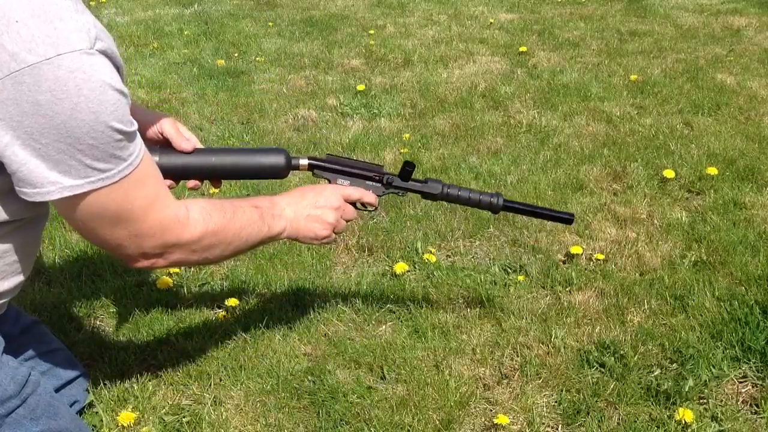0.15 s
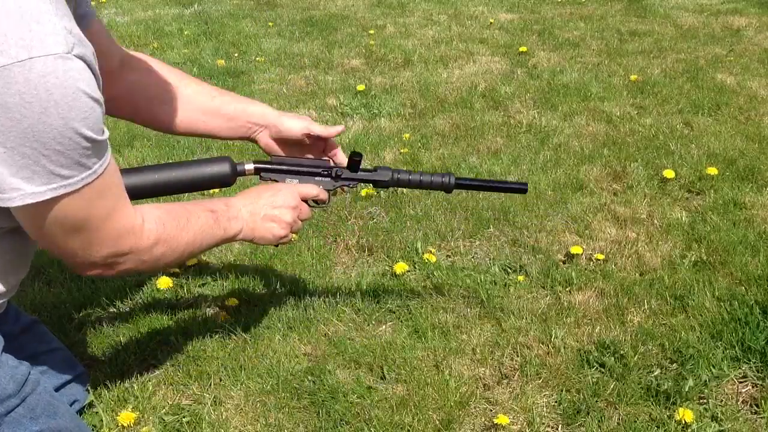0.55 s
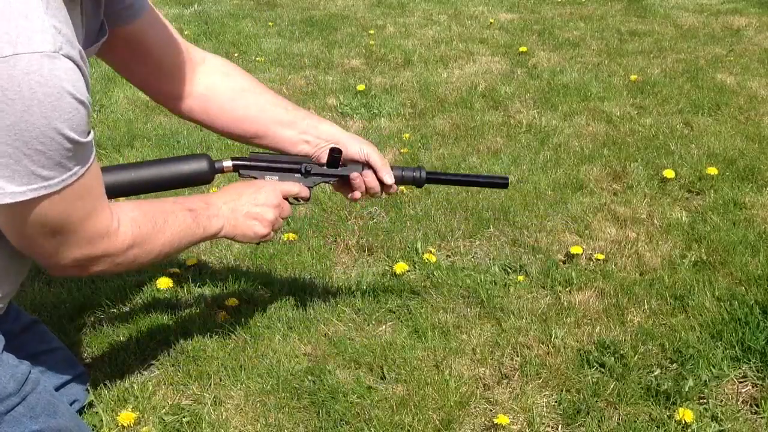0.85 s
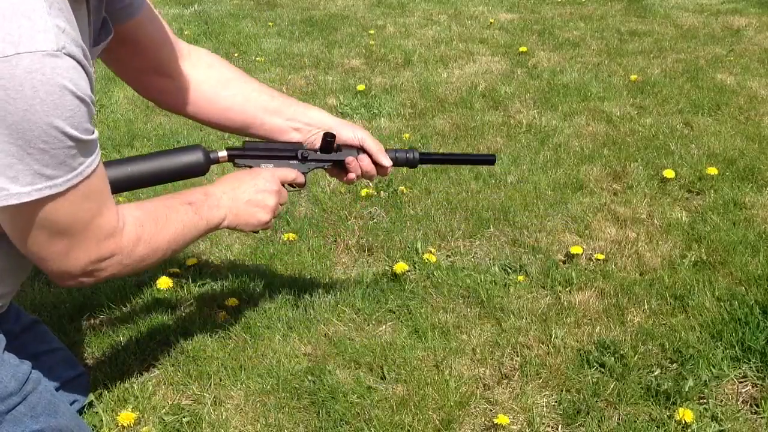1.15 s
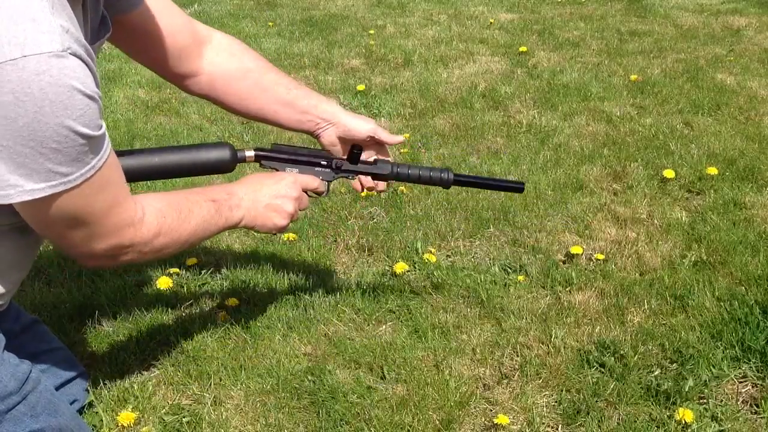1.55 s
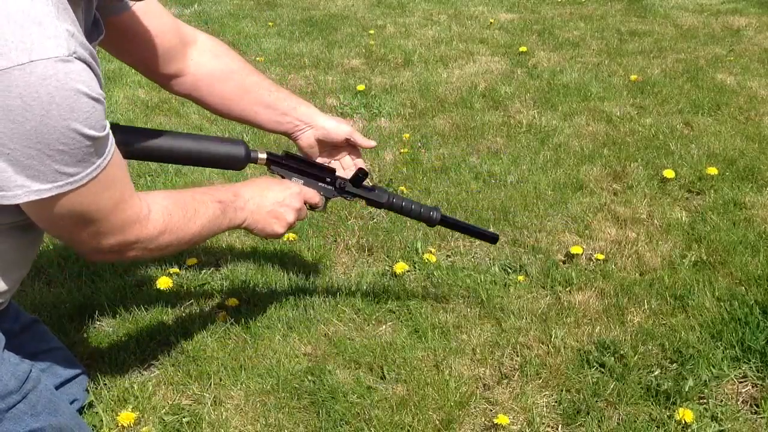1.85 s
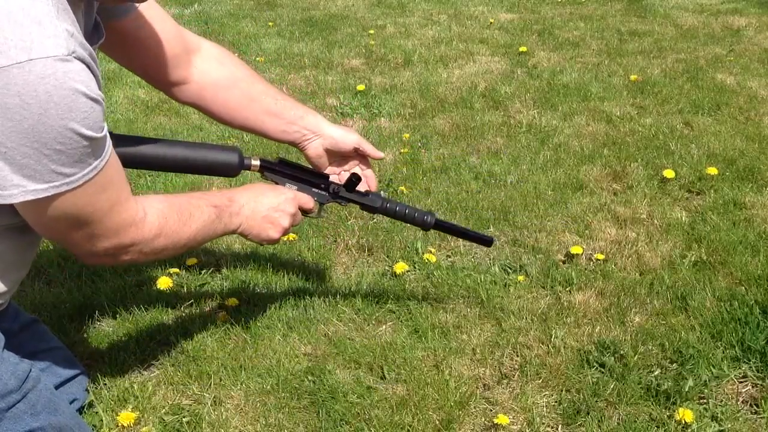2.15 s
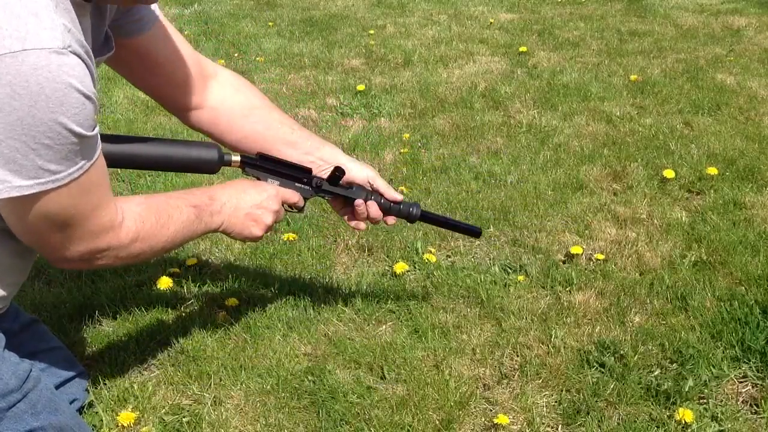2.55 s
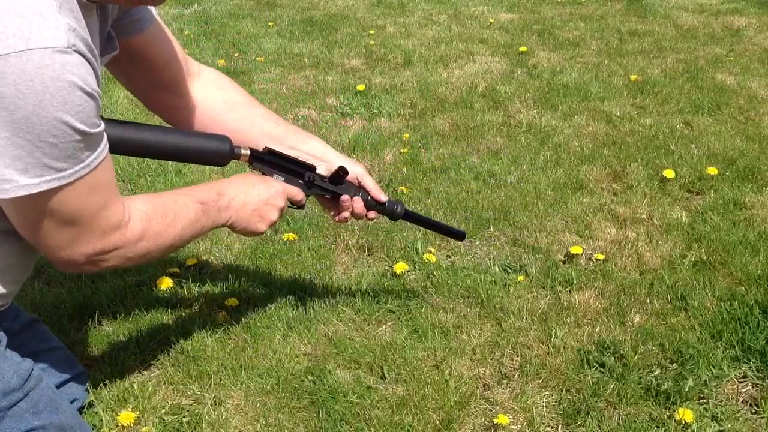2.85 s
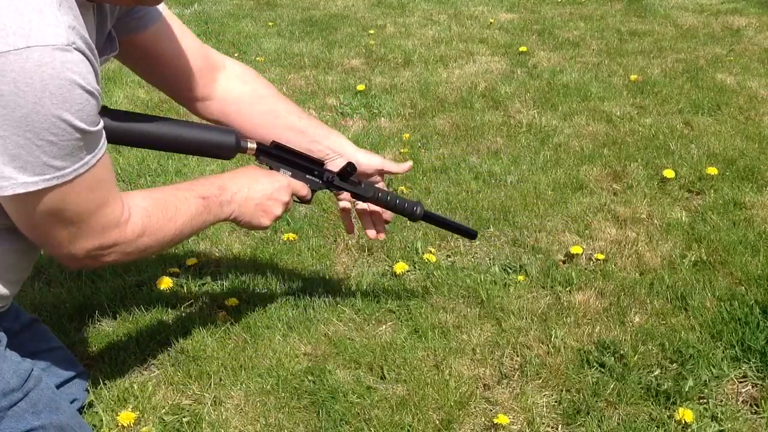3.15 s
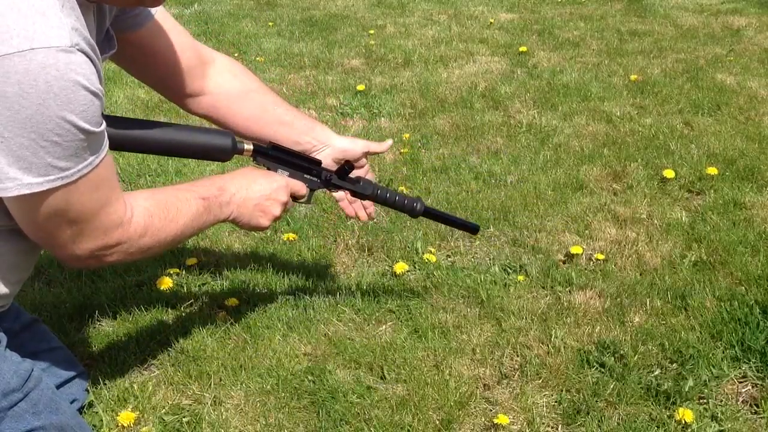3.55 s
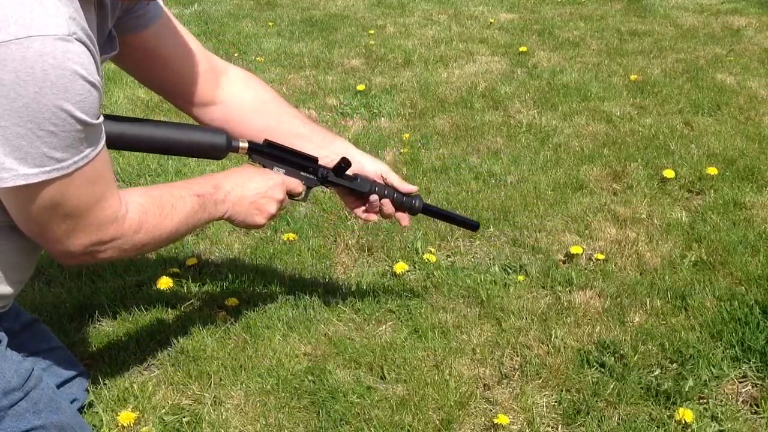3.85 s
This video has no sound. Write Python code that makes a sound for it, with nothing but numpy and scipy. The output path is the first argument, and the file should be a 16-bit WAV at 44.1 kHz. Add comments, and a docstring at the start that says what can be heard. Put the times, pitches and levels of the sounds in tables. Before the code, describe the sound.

A paintball marker is cycled and fired twice on a lawn, close to a small microphone. After quiet air, faint birds and distant traffic, the pump clacks back with a hollow pop at 0.9 seconds and forward at 1.25. A loud, slightly clipped gas crack follows at 2.1, echoing from walls and trees. Drier clacks come at 2.7 and 3.0, then a second shot at 3.4 fades in a diffuse tail.

```python
"""A lawn, near walls around it and trees beyond, with one small microphone close to a gas paintball marker.
Its pump is cycled twice, clacking at rear and front stops; the first pull adds a hollow pop of air modes.
Each of two shots is hammer ticks, a pressure crack, a gas rush of decaying noise and a barrel ring,
thrown back by walls as delayed copies and by yard and trees as diffuse noise tails.
Underneath lie faint gliding bird notes and filtered noise for open air, a drone and far traffic."""
import sys
import numpy as np
from scipy import signal
from scipy.fft import rfft, irfft, next_fast_len
from scipy.io import wavfile
from scipy.ndimage import map_coordinates

SR = 44100
rng = np.random.default_rng(int(sys.argv[2]) if len(sys.argv) > 2 else 0)


def store_wav(level_fs):
    """Save 16-bit WAV to argv[1]."""
    pcm = np.round(np.clip(np.atleast_2d(level_fs), -1, 1) * 32767)
    wavfile.write(sys.argv[1], SR, pcm.T.astype(np.int16))


N = 176400

# Open air, relative spectrum: pitch_hz, level_db (per Hz)
AIR_COLOUR = [(15, -81), (25, -51), (43, -74), (71, -20.5), (118, -12.5), (237, 1.5), (335, -8), (475, -5),
              (621, -8), (952, -6.5), (2130, -19), (3090, -20.5), (3440, -23.5), (4620, -24), (5280, -24),
              (6200, -24.5), (15000, -30.5)]
AIR_DB, AIR_WAVER_DB, AIR_WAVER_RATE = -54.5, 0.96, 6.18  # rate in knots per second
# Far traffic, relative spectrum: pitch_hz, level_db (per Hz)
TRAFFIC_COLOUR = [(200, -16), (550, -5), (950, 3.5), (1400, -4), (2500, -30), (6000, -49)]
# Far traffic over time: time_s, level_db
TRAFFIC_FADE = [(0, -54.5), (.5, -60.5), (1, -57), (2, -69.5), (3, -67), (4, -65)]
DRONE_HZ, DRONE_WIDTH_HZ, DRONE_DB = 229.4, 50, -63

# Bird notes: start_s, length_s, start_pitch_hz, end_pitch_hz, level_db, buzz (0-1)
BIRD_NOTES = [(0, 0.33, 5070, 6050, -70, 0.3), (.365, 0.042, 7880, 8300, -62, .3),
              (0.358, 0.046, 3060, 2950, -63.5, 0.48), (.72, 0.23, 5110, 5300, -69.5, 0.25),
              (1.063, 0.099, 3490, 2760, -54.5, 0.85), (1.48, .2, 5150, 5600, -77, .08),
              (1.787, 0.041, 5900, 7400, -65, 0.4), (1.827, 0.054, 4030, 3670, -63, 0.7),
              (1.849, 0.061, 3150, 2670, -53.5, .6), (2.514, 0.064, 2430, 2600, -51.5, 0.83),
              (3.253, 0.048, 2330, 2600, -54, 0.52)]
BUZZ_HZ, BUZZ_RATE = 400, 800  # pitch wobble at buzz 1; knots per second

# Small ticks of pump and trigger: start_s, level_db
HANDLING_TICKS = [(.884, -49), (1.178, -40.5), (1.207, -49.5), (2.623, -39), (2.897, -50.5), (3.088, -50),
                  (3.143, -45.5), (3.371, -50.5)]
TICK_T60_S = 0.033
# Pump strokes: stop_s, front_stop (0/1), clash_db, ring_db, ring_length_factor, tilt_db_per_octave,
# rebound_delay_s, rebound_db (re clash), slide_lead_s, slide_db
PUMP_STROKES = [(0.9391, 0, -19, -23, 0.37, 2, .002, 1.5, 0.0085, -41),
                (1.2479, 1, -11, -46, 1.2, 1.5, 0.0034, -6, 0.0048, -40),
                (2.6847, 0, -18, -34, 1.13, 2.2, .003, -14, 0.0095, -39.5),
                (2.9881, 1, -16, -34, 1.23, 2, .003, 4.5, 0.0056, -44)]
# Clash of the pump parts, relative spectrum: pitch_hz, level_db
CLASH_SPECTRUM = [(60, -18), (300, -4.5), (750, -11.5), (1800, -7.5), (2800, 2.5), (5500, -3), (7500, -7),
                  (9500, -5.5), (12000, -11.5), (15000, -21)]
CLASH_T60_S, CLASH_ATTACK_S, SLIDE_T60_S = 0.015, 0.00061, 0.06
SNAP_DB, SNAP_LAG_S = 6.5, 0.0007  # pressure snap, re clash level and stop time
# Modes of the marker body: pitch_hz, t60_s (before the length factor), rear_stop_db, front_stop_db
BODY_MODES = [(698, 0.062, 1, -2.5), (811, 0.067, 3.5, -9), (1149, 0.084, -4.5, 5), (1292, 0.053, -0.5, 2),
              (1690, 0.043, -4, -2), (1786, 0.052, 5, -27), (2530, .07, -10, -2), (2670, 0.083, -18, -7),
              (3660, 0.11, -8, 0), (4700, 0.13, -10, -8), (5900, 0.084, -11, -10)]
# Dense faint modes of the small steel parts
STEEL_LOW_HZ, STEEL_HIGH_HZ, STEEL_DB, STEEL_T60_S = 4180, 11400, -37, 0.09
# Air in the opened breech and barrel: pitch_hz, level_db (re POP_DB), t60_s
POP_MODES = [(464, -23.5, 0.33), (757, 1, 0.05), (814, 0.5, 0.036), (927.6, -5, 0.09), (1338, -4, 0.043),
             (1711, 0.5, 0.041), (1916, -7, 0.027), (2090, -1, 0.023), (2210, -4.5, 0.03),
             (2780, -11, 0.042), (3820, -32, 0.057), (6660, -3.5, 0.013), (7500, -7.5, 0.016)]
POP_S, POP_DB, POP_RISE_S, POP_LOW_HZ = 0.9397, -10, 0.00084, 430
PUMP_LOW_HZ = 175
# Handling sounds spread over the yard, relative bands: pitch_hz, level_db, t60_s
YARD_SPREAD = [(200, 8, 0.079), (1000, 7, 0.087), (3000, 0, 0.18), (7300, -1.5, 0.23), (15100, -4.5, 0.14)]
SPREAD_DB, CLACK_FAR_DB = -17, -32
CLACK_WALL_S, CLACK_WALL_DB = 0.022, -21

# Shots: start_s, level_db, push_db, push_pitch_hz, bark_db (around BARK_HZ), wall_gas_db
SHOT_EVENTS = [(2.079, -10.5, -11.5, 220, 1, -0.5), (3.412, -11, -10.5, 336, 1.5, 2)]
# Mechanism before the valve opens: lead_s, level_db, t60_s
HAMMER_TICKS = [(.0085, -24, 0.021), (0.0051, -14.5, 0.021)]
# Hammer, relative spectrum: pitch_hz, level_db
HAMMER_SPECTRUM = [(100, -15), (600, 1), (1500, -4), (4000, 10), (8000, 2), (15000, 4.5)]
# Below, shot parts and echoes are relative to each shot's level; the push has its own level.
# Gas rush, relative bands: pitch_hz, level_db, t60_s
GAS_BANDS = [(30, -10, 0.048), (86, -32, 0.026), (150, 5, 0.089), (260, 8.5, 0.1), (450, 3.5, 0.063),
             (760, 3.5, 0.066), (1300, -5.5, 0.06), (2520, -5, 0.082), (5000, -4.5, 0.067),
             (9150, -3.5, 0.052), (15200, -11.5, 0.04)]
GAS_DB, GAS_ATTACK_S, BARK_HZ, BARK_OCTAVES = 25, 0.00015, 800, 0.41
CRACK_DB, CRACK_LAG_S = 15.5, 0.001528
SHOCK_ZERO_S = 0.00012  # time from the pressure jump to its first zero
PUSH_T60_S, PUSH_RISE_S, PUSH_DELAY_S = 0.032, 0.0013, 0.00344
# Barrel ring: pitch_hz, t60_s, first_shot_db, second_shot_db
BARREL_MODES = [(987, 0.23, -42, -13.5), (1040, 0.19, -15.5, -23), (1408, 0.11, -15, -30),
                (1515, 0.15, -21, -20), (1724, 0.12, -23, -36), (2140, .13, -26, -17),
                (2213, 0.2, -15.5, -18), (2440, 0.19, -12.5, -30), (3000, .14, -18, -32),
                (3390, 0.19, -20, -14)]
BARREL_RISE_S = 0.0049
# Reflections from single walls: delay_s, crack_db, gas_db, push_db (each re its direct sound)
WALL_ECHOES = [(.0095, -1, -15, -20), (.018, -4, -3.5, -5), (.0213, 3, -1.5, -23), (.0245, 1.5, -12, -35),
               (0.0286, -6, -6, -13), (.032, -7.5, -19, -21), (.035, -9, -37, -18)]
WALL_T60_S = 0.036  # added decay of the reflected gas
# Slaps from far walls: delay_s, level_db
FAR_WALL_SLAPS = [(0.097, -6.5), (0.1, -6), (.117, -5.5)]
# Far walls, relative spectrum: pitch_hz, level_db
FAR_WALL_SPECTRUM = [(100, -20), (1000, 3.5), (2500, 1), (5500, 12.5), (9000, -22), (15000, -26)]
SLAP_T60_S = 0.008
# Scattering near by, from fence and house, relative bands: pitch_hz, level_db, t60_s
NEAR_BANDS = [(61, -36, 0.14), (120, -25, 0.18), (171, -2, 0.33), (231, 10.5, 0.46), (328, -5, 0.13),
              (497, -9, 0.42), (800, -0.5, 0.11), (1300, 6, .11), (2980, 1.5, 0.19), (7000, -4, 0.26),
              (15200, 0, 0.11)]
NEAR_DELAY_S, NEAR_RISE_S, NEAR_DB = 0.027, 0.0027, 24
# Scattering far off, from trees, relative bands: pitch_hz, level_db, t60_s
TREE_BANDS = [(60, -62, 0.15), (131, -20, 0.57), (218, 16.5, 0.55), (342, -9, 0.42), (550, -6.5, 0.47),
              (1066, -1.5, 0.53), (2330, 1.5, 0.63), (4950, 2, 0.48), (7750, -2.5, 0.44),
              (14900, -11.5, 0.26)]
FAR_DELAY_S, FAR_RISE_S, FAR_DB = 0.094, 0.0097, 20.5
RING_NEAR_DB, RING_FAR_DB = -3, -12.5  # barrel ring sent into the two scattered tails

CLIP_TOP, CLIP_HARDNESS, TOP_HZ = 0.76, 5, 15400


def amp(db):
    """Decibels to gain."""
    return 10 ** (np.asarray(db) / 20)


def unit(x):
    """Scale to rms 1."""
    return x / np.sqrt(np.mean(x ** 2) + 1e-20)


def along(points, hz, axis=1):
    """One column of a table, read on log frequency."""
    columns = np.transpose(points)
    return np.interp(np.log(hz + 1), np.log(columns[0] + 1), columns[axis])


def clock():
    """The one-second time axis of an event."""
    return np.arange(SR) / SR


def add(track, s, x):
    """Mix x into the track at time s."""
    i = max(round(s * SR), 0)
    track[i:i + len(x)] += x[:len(track) - i]


def filtered(x, response):
    """x times a gain that depends on frequency."""
    size = next_fast_len(len(x) + SR // 4)
    gain = response(np.fft.rfftfreq(size, 1 / SR))
    return irfft(rfft(x, size) * gain, size)[:len(x)]


def high_pass(x, hz):
    """Small parts radiate little bass."""
    return signal.sosfilt(signal.butter(2, hz, "high", fs=SR, output="sos"), x)


def noise(colour, size, tilt_db=0):
    """Coloured noise of rms 1, tilted by some dB per octave."""
    def response(hz):
        return amp(along(colour, hz) + tilt_db * np.log2(hz + 1))
    return unit(filtered(rng.standard_normal(size), response))


def wobble(rate, size):
    """A smooth random curve, rate knots a second."""
    knots = rng.standard_normal(int(size * rate / SR) + 4)
    return map_coordinates(knots, [np.arange(size) * rate / SR])


def decay(t60):
    """An exponential fall of 60 dB in t60 seconds."""
    return np.exp(-np.log(1000) * clock() / t60)


def fall(t60, attack):
    """A quick rise and an exponential decay."""
    return decay(t60) * (1 - np.exp(-clock() / attack))


def ring(modes, attack):
    """Damped sines of random polarity from (pitch_hz, level_db, t60_s) rows."""
    out = np.zeros(SR)
    for hz, db, t60 in modes:
        sine = np.sin(2 * np.pi * hz * clock()) * rng.choice([-1, 1])
        out += amp(db) * fall(t60, attack) * sine
    return out


def shock():
    """A steep pressure jump followed by a suction."""
    u = clock() / SHOCK_ZERO_S
    return (1 - u) * np.exp(-u)


def scatter(bands, delay, rise):
    """A diffuse response of energy 1 whose bands die at their own speeds."""
    hz, t, grains = signal.stft(rng.standard_normal(SR), SR, nperseg=512)
    t60 = along(bands, hz, axis=2)[:, None]
    gain = amp(along(bands, hz))[:, None] * np.exp(-np.log(1000) * t / t60)
    tail = signal.istft(grains * gain, SR)[1][:SR] * (1 - np.exp(-clock() / rise))
    out = np.zeros(SR)
    add(out, delay, tail / np.linalg.norm(tail))
    return out


def tree_scatter():
    """Distant trees return a late diffuse tail."""
    return scatter(TREE_BANDS, FAR_DELAY_S, FAR_RISE_S)


def through(x, response):
    """x sent along the paths of a response."""
    return signal.fftconvolve(x, response)[:len(x)]


def outdoors():
    """Gently wavering open air, a low distant drone and fading traffic, all coloured noise."""
    air = amp(AIR_DB + AIR_WAVER_DB * wobble(AIR_WAVER_RATE, N)) * noise(AIR_COLOUR, N)
    traffic_db = np.interp(np.arange(N) / SR, *np.transpose(TRAFFIC_FADE))
    traffic = amp(traffic_db) * noise(TRAFFIC_COLOUR, N)

    def drone_band(hz):
        return np.exp(-((hz - DRONE_HZ) / DRONE_WIDTH_HZ) ** 2)
    drone = unit(filtered(rng.standard_normal(N), drone_band))
    return air + traffic + amp(DRONE_DB) * drone


def birds():
    """Distant thin whistles glide in pitch; fast random pitch wobble makes chirps buzzy."""
    out = np.zeros(N)
    for s, length, start_hz, end_hz, db, buzz in BIRD_NOTES:
        u = np.linspace(0, 1, int(length * SR))
        glide_hz = start_hz + (end_hz - start_hz) * u ** 2
        hz = glide_hz + buzz * BUZZ_HZ * wobble(BUZZ_RATE, len(u))
        swell = np.sqrt(2 * np.abs(np.sin(np.pi * u)))
        add(out, s, amp(db) * swell * np.sin(2 * np.pi * np.cumsum(hz) / SR))
    return out


def handling_ticks():
    """Small contacts of pump and trigger make short noise bursts."""
    out = np.zeros(N)
    for s, db in HANDLING_TICKS:
        add(out, s, amp(db) * noise(CLASH_SPECTRUM, SR) * fall(TICK_T60_S, CLASH_ATTACK_S))
    return out


def steel(count=40):
    """Springs, rods and screws ring together in many close modes."""
    weights = unit(rng.uniform(.5, 1, count))
    pitches = rng.uniform(STEEL_LOW_HZ, STEEL_HIGH_HZ, count)
    rings = np.array([ring([(hz, 0, STEEL_T60_S)], CLASH_ATTACK_S) for hz in pitches])
    return weights @ rings / np.sqrt(count)


def pump_strokes():
    """The pump slides, snaps against its stop, rebounds and rings body and steel parts."""
    out = np.zeros(N)
    for (s, front, clash_db, ring_db, length, tilt_db,
         rebound_s, rebound_db, lead, slide_db) in PUMP_STROKES:
        slide = noise(CLASH_SPECTRUM, SR) * fall(SLIDE_T60_S, CLASH_ATTACK_S)
        add(out, s - lead, amp(slide_db) * slide)
        add(out, s + SNAP_LAG_S, amp(clash_db + SNAP_DB) * shock())
        for delay, db in [(0, clash_db), (rebound_s, clash_db + rebound_db)]:
            clash = noise(CLASH_SPECTRUM, SR, tilt_db) * fall(CLASH_T60_S, CLASH_ATTACK_S)
            add(out, s + delay, amp(db) * clash)
        modes = [(hz, front_db if front else rear_db, t60 * length)
                 for hz, t60, rear_db, front_db in BODY_MODES]
        body = amp(ring_db) * ring(modes, CLASH_ATTACK_S)
        add(out, s, body + amp(STEEL_DB) * steel())
    return out


def breech_pop():
    """Air in the opened breech and barrel resonates as a hollow pop."""
    out = np.zeros(N)
    add(out, POP_S, amp(POP_DB) * high_pass(ring(POP_MODES, POP_RISE_S), POP_LOW_HZ))
    return out


def pump():
    """Handling sounds reach the microphone directly, off a wall, and scattered by yard and trees."""
    direct = high_pass(handling_ticks() + pump_strokes() + breech_pop(), PUMP_LOW_HZ)
    yard = amp(SPREAD_DB) * scatter(YARD_SPREAD, 0, NEAR_RISE_S)
    yard += amp(CLACK_FAR_DB) * tree_scatter()
    add(yard, CLACK_WALL_S, amp([CLACK_WALL_DB]))
    return direct + through(direct, yard)


def hammer(out, s):
    """The moving hammer makes noise ticks just before the valve opens."""
    for lead, db, t60 in HAMMER_TICKS:
        tick = noise(HAMMER_SPECTRUM, SR) * fall(t60, CLASH_ATTACK_S)
        add(out, s - lead, amp(db) * tick)


def gas_rush(bark_db):
    """Escaping gas is noise decaying band by band, with a bark bump around BARK_HZ."""
    bands = []
    for hz, db, t60 in GAS_BANDS:
        bump = np.exp(-(np.log2(hz / BARK_HZ) / BARK_OCTAVES) ** 2)
        bands.append((hz, db + bark_db * bump, t60))
    return amp(GAS_DB) * scatter(bands, 0, GAS_ATTACK_S)


def add_walls(shot, crack, push, bark_db, walls_db):
    """Near walls return crack, gas and push; far walls return short noise slaps."""
    for delay, crack_db, gas_db, low_db in WALL_ECHOES:
        puff = amp(gas_db + walls_db) * gas_rush(bark_db) * decay(WALL_T60_S)
        add(shot, delay, amp(crack_db) * crack + puff + amp(low_db) * push)
    for delay, db in FAR_WALL_SLAPS:
        slap = noise(FAR_WALL_SPECTRUM, SR) * fall(SLAP_T60_S, GAS_ATTACK_S)
        add(shot, delay, amp(db) * slap)


def scattered_tail(barrel):
    """Fence, house and trees return the shot as diffuse noise, with the barrel ring sent through it."""
    near = scatter(NEAR_BANDS, NEAR_DELAY_S, NEAR_RISE_S)
    far = tree_scatter()
    ring_paths = amp(RING_NEAR_DB) * near + amp(RING_FAR_DB) * far
    return amp(NEAR_DB) * near + amp(FAR_DB) * far + through(barrel, ring_paths)


def shots():
    """The hammer flies, the valve cracks open, gas rushes from the ringing barrel; walls and trees answer."""
    out = np.zeros(N)
    crack = amp(CRACK_DB) * shock()
    for k, (s, db, push_db, push_hz, bark_db, walls_db) in enumerate(SHOT_EVENTS):
        hammer(out, s)
        push_sine = np.sin(2 * np.pi * push_hz * clock())
        # The shot level is taken out here because it is applied to the whole shot below.
        push = amp(push_db - db) * fall(PUSH_T60_S, PUSH_RISE_S) * push_sine
        modes = [(hz, levels[k], t60) for hz, t60, *levels in BARREL_MODES]
        barrel = ring(modes, BARREL_RISE_S)
        shot = gas_rush(bark_db) + barrel
        add(shot, CRACK_LAG_S, crack)
        add(shot, PUSH_DELAY_S, push)
        add_walls(shot, crack, push, bark_db, walls_db)
        add(out, s, amp(db) * (shot + scattered_tail(barrel)))
    return out


def scene():
    """Everything at the one microphone."""
    return (outdoors() + birds() + pump() + shots())[None]


def record(dry):
    """The recorder rounds off the highest peaks and keeps nothing above its band limit."""
    def in_band(hz):
        return hz < TOP_HZ
    band = filtered(dry[0], in_band)
    clipped = band / (1 + np.abs(band / CLIP_TOP) ** CLIP_HARDNESS) ** (1 / CLIP_HARDNESS)
    return filtered(clipped, in_band)[None]


dry = scene()
out = record(dry)
store_wav(out)
```